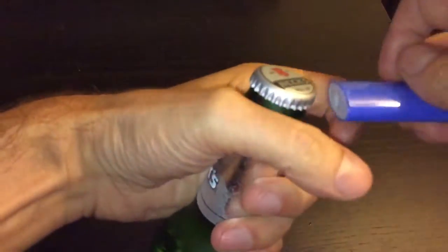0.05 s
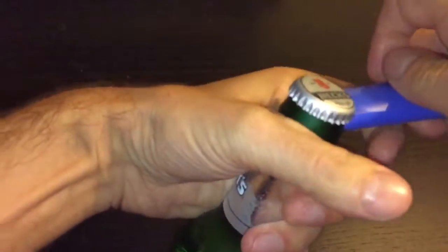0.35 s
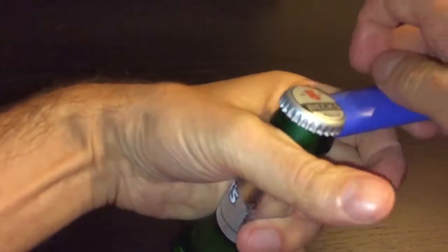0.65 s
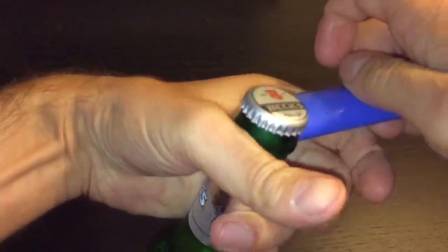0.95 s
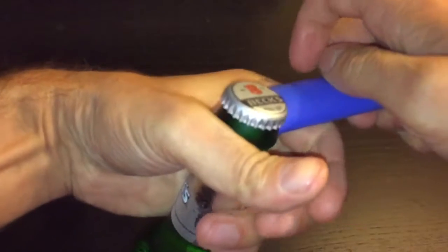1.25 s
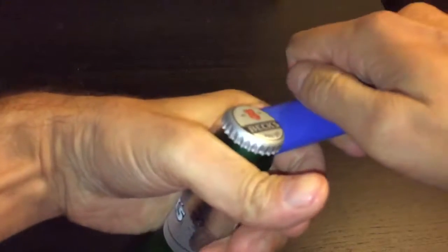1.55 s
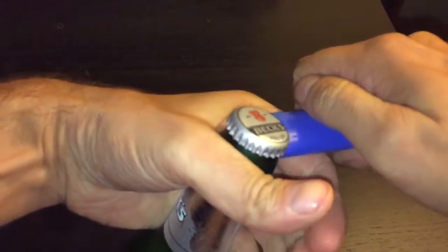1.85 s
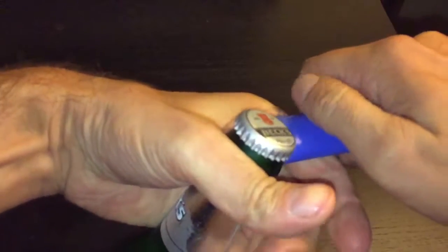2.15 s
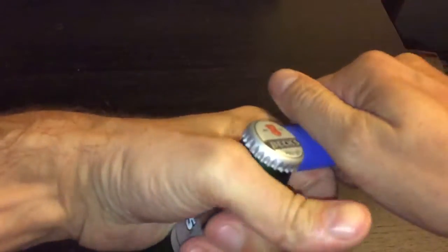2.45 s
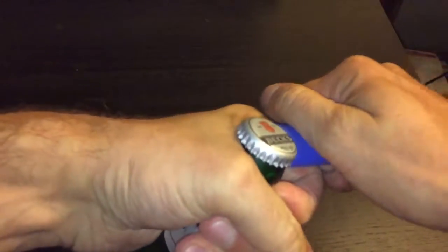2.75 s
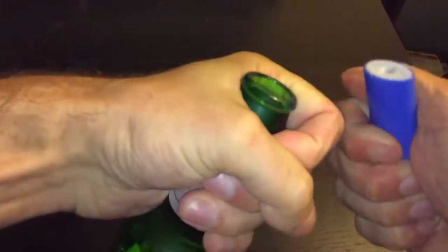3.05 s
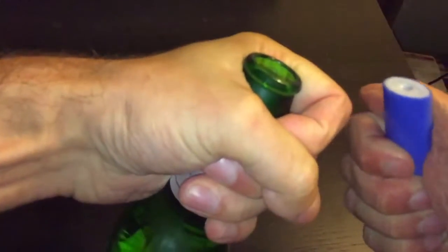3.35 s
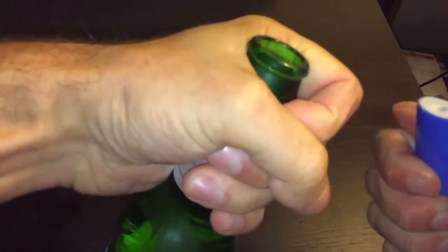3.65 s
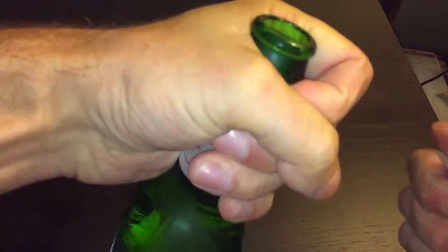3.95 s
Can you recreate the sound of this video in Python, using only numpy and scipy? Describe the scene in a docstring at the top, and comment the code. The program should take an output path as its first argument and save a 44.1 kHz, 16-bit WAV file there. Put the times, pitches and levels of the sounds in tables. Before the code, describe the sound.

A bottle cap is popped off with a lighter, close up in a small room. Plastic ticks and scuffs on the metal cap during the first second, then slips with two snaps near 1.9 and 2.3 seconds. At 2.9 seconds comes a loud, hollow, slightly distorted pop. Faint fizz follows, the cap clatters further off around 3.4 seconds, and the bottle softly bumps the table until about 4 seconds.

```python
"""Opening a bottle with a lighter

In a small room a plastic lighter ticks, scuffs and snaps against the crown cap of a glass bottle.
The seal cracks, and a blast of gas rings the neck with a pop that overloads the microphone.
The cap lands and clatters further off, the bottle bumps the table, and the drink fizzes lightly."""
import sys
import numpy as np
from scipy import signal
from scipy.fft import rfft, irfft
from scipy.io import wavfile
from scipy.ndimage import uniform_filter1d

SR = 44100
rng = np.random.default_rng(int(sys.argv[2]) if len(sys.argv) > 2 else 0)


def store_wav(level_fs):
    """Save 16-bit WAV to argv[1]."""
    pcm = np.round(np.clip(np.atleast_2d(level_fs), -1, 1) * 32767)
    wavfile.write(sys.argv[1], SR, pcm.T.astype(np.int16))


N = 176400
TIME_S = np.arange(N) / SR
EVENT_S = TIME_S[:SR]  # time within one event

# room decay: freq_hz, t60_s
ROOM_DECAY = [(100, 0.16), (300, 0.45), (1000, 0.27), (3000, 0.22), (8000, 0.27), (16000, 0.063)]


def amp(db):
    """Decibels to gain."""
    return 10 ** (np.asarray(db) / 20)


def unit(x):
    """Scale to rms 1."""
    return x / np.sqrt(np.mean(x ** 2) + 1e-20)


def read(points, hz):
    """Interpolate a table over log frequency."""
    freq_hz, value = np.transpose(points)
    return np.interp(np.log(hz + 1), np.log(freq_hz + 1), value)


def add(mix, start_s, sound):
    """Mix a sound in at start_s."""
    part = mix[round(start_s * SR):][:len(sound)]
    part += sound[:len(part)]


def fade(time_s, t60_s):
    """Exponential decay."""
    return np.exp(-np.log(1000) * time_s / t60_s)


def ramp(rise_s):
    """Linear attack, held at 1."""
    return np.minimum(EVENT_S / rise_s, 1)


def colour(x, spectrum, size=4096):
    """Causal unit-energy filter with the given spectral shape."""
    log_gain = np.log(amp(read(spectrum, abs(np.fft.fftfreq(size, 1 / SR)))))
    taps = np.fft.ifft(np.exp(np.conj(signal.hilbert(log_gain)))).real[:size // 2]
    return signal.fftconvolve(x, taps / np.linalg.norm(taps))[:len(x)]


def burst(spectrum, t60_s):
    """Decaying puff of coloured noise."""
    return colour(rng.standard_normal(SR) * fade(EVENT_S, t60_s), spectrum)


def click(spectrum, scatter, t60_s):
    """One sharp contact, then a short noisy scatter."""
    drive = rng.standard_normal(SR) * fade(EVENT_S, t60_s)
    drive *= scatter / np.linalg.norm(drive)
    drive[0] = 1
    return colour(drive, spectrum)


def ring(modes, rise_s=.0008):
    """Decaying sine modes of a resonator."""
    rise = 1 - np.exp(-EVENT_S / rise_s)
    return rise * sum(amp(db) * fade(EVENT_S, t60_s) * np.sin(2 * np.pi * hz * EVENT_S)
                      for hz, db, t60_s in modes)


def struck(modes, vary_db=3.0):
    """Each touch lands on another spot and reweights the weaker modes."""
    return ring([(hz, db + rng.uniform(-1.26, 1) * vary_db * (db < 0), t60_s) for hz, db, t60_s in modes])


def room(x, decay, rise_s=0.0026):
    """Diffuse tail with a decay time per band."""
    hz, time_s, bands = signal.stft(rng.standard_normal(SR), SR, nperseg=256)
    tail = signal.istft(bands * fade(time_s, read(decay, hz)[:, None]), SR, nperseg=256)[1][:SR]
    tail *= 1 - np.exp(-(EVENT_S / rise_s) ** 2)
    return signal.fftconvolve(x, tail / np.linalg.norm(tail))[:N]


def nearby(x, count=12, span_s=.012, echo_gain=.9):
    """Early reflections off nearby surfaces ripple the spectrum."""
    taps = np.zeros(round(span_s * SR))
    taps[rng.integers(count, len(taps), count)] = rng.choice([-1, 1], count) * echo_gain / np.sqrt(count)
    taps[0] = 1
    return signal.fftconvolve(x, taps / np.linalg.norm(taps))[:N]


def air(level_db=-67, split_hz=350, wander_db=-4):
    """Steady room hiss over the wandering rumble of gripping hands."""
    # background spectrum: freq_hz, gain_db
    spectrum = [(15, -36), (25, -7.5), (64, -1), (102, -13.5), (166, -15), (217, -16.5), (503, -32.5),
                (695, -31.5), (2410, -36.5), (3340, -35.5), (5000, -41), (6380, -40), (16000, -48)]
    # grip rumble: time_s, gain_db
    grip = [(0, 1), (.7, -0.5), (1.05, -5), (1.4, 2), (2.2, -3.5), (2.85, 0.5), (3.1, -6), (4.0, -11.5)]
    hz = np.fft.rfftfreq(N, 1 / SR)
    noise_bins = rfft(rng.standard_normal(N)) * amp(read(spectrum, hz))
    lowpass = 1 / (1 + (hz / split_hz) ** 4)
    rates_hz = np.geomspace(.7, 9, 20)
    wander = unit(sum(np.sin(2 * np.pi * (rate * TIME_S + rng.random())) for rate in rates_hz))
    rumble_db = wander_db * wander + np.interp(TIME_S, *np.transpose(grip))
    rumble = irfft(noise_bins * lowpass, N) * amp(rumble_db)
    hiss = irfft(noise_bins * (1 - lowpass), N)
    return amp(level_db) * unit(rumble + hiss)


def bubbles(rate_per_s=1200, spread_db=1):
    """Bursting bubbles as a dense random impulse train."""
    size = amp(spread_db * np.minimum(rng.exponential(1, N), 5))
    return unit(size * rng.choice([-1, 1], N) * (rng.random(N) < rate_per_s / SR))


def fizz():
    """Bubbles burst in the open bottle; hollow resonances swell and fade."""
    # fizz spectrum: freq_hz, gain_db
    spectrum = [(60, -13), (200, 8), (330, 4.5), (550, 0.5), (1000, 0.5), (1550, -6.5), (2100, -2.5),
                (3000, -9), (4300, -15), (6500, -31.5), (7900, -24.5), (9500, -31.5), (13500, -32.5),
                (16000, -38.5)]
    # fizz envelope: time_s, level_db
    envelope = [(2.95, -70.5), (3.17, -66), (3.21, -61), (3.33, -59.5), (3.55, -56.5), (3.75, -59),
                (3.87, -63), (4.0, -64)]
    # hollow resonances: centre_hz
    centres_hz = [935, 890, 930, 1850, 3270, 345, 1272, 2050, 7800, 4300]
    # swell of each resonance: peak_s, sigma_s, width_hz, level_db
    swells = [(3.12, .08, 40, -66), (3.22, .035, 50, -57), (3.39, .11, 50, -55), (3.15, .2, 70, -68),
              (3.28, .15, 130, -68), (3.68, .14, 70, -63), (3.87, .17, 25, -62), (3.8, .2, 200, -67),
              (3.81, .08, 450, -76), (3.98, .12, 700, -75)]
    time_s, level_db = np.transpose(envelope)
    out = amp(np.interp(TIME_S, time_s, level_db)) * colour(bubbles(), spectrum)
    drive = bubbles()
    for hz, (peak_s, sigma_s, width_hz, db) in zip(centres_hz, swells):
        b, a = signal.iirpeak(hz, hz / width_hz, SR)
        hollow = unit(signal.lfilter(b, a, signal.lfilter(b, a, drive)))
        swell = np.exp(-((TIME_S - peak_s) / sigma_s) ** 2 / 2)
        out += amp(db) * swell * hollow
    return out * (TIME_S > time_s[0])


def table_bumps(octave_db=-13.5):
    """The bottle bumps the table top: soft low tones, each with its octave."""
    # bumps: start_s, level_db, pitch_hz, t60_s
    bumps = [(3.425, -35, 191, 0.1), (3.495, -35.5, 185.7, 0.17), (3.838, -38, 163, 0.11),
             (3.887, -44.5, 178, 0.1), (3.927, -46.5, 154, 1)]
    out = np.zeros(N)
    for start_s, db, hz, t60_s in bumps:
        add(out, start_s, ramp(0.015) * ring([(hz, db, t60_s), (2 * hz, db + octave_db, t60_s)]))
    return out


def loose_cap(rattle_wet_db=-4.5, rim_wet_db=-14, tail_t60_s=0.92):
    """The cap bounces some way off: rim pings, rattle and a long rustling tail."""
    # bounces: start_s, rattle_db, rattle_t60_s, ping_db
    landings = [(3.3138, -37.5, 0.029, -36.5), (3.3665, -25.5, 0.029, -29), (3.427, -34.5, 0.16, -28),
                (3.487, -46, 0.025, -44), (3.51, -39, 0.039, -42.5)]
    # rattle spectrum: freq_hz, gain_db
    spectrum = [(60, -4), (180, -2), (400, -5), (650, 3.5), (1000, -10), (1450, -13.5), (2300, 0.5),
                (2750, -2.5), (3400, -19.5), (3900, -13), (4600, -38), (5300, -13), (6400, -42),
                (8500, -34.5), (12500, -39.5), (15300, -30)]
    # cap rim: freq_hz, gain_db, t60_s
    rim_modes = [(5520, 0, .011), (5200, -6, .016), (5750, -8, .01), (8500, -17, .01), (14450, -23, .008),
                 (15350, -23, .008)]
    rattle, rim = np.zeros(N), np.zeros(N)
    for start_s, rattle_db, t60_s, ping_db in landings:
        add(rattle, start_s, amp(rattle_db) * burst(spectrum, t60_s) * ramp(0.0034))
        add(rim, start_s, amp(ping_db) * ring(rim_modes))
    send = amp(rattle_wet_db) * rattle + amp(rim_wet_db) * rim
    return rattle + rim + room(send, [(1000, tail_t60_s)])


def lighter(wet_db=-16):
    """The lighter taps and rubs the cap and slips on its teeth under load; cap and glass ring."""
    # touches: start_s, tick_db, scatter_t60_s, cap_db, teeth_db, glass_db
    taps = [(0.2694, -19.5, 0.032, -32.5, -54, -63), (0.3961, -41.5, 0.032, -48, -80, -75.5),
            (0.5608, -20.5, 0.028, -34, -59, -62), (0.6504, -22.5, 0.018, -43.5, -67, -56)]
    # slips: start_s, snap_db, glass_db
    snaps = [(1.8978, -19, -62), (2.3464, -14, -57.5)]
    # fingers and plastic rubbing: start_s, level_db, t60_s, centre_hz, width_oct
    scuffs = [(0.1, -54.5, 0.15, 1450, 0.88), (0.367, -64, 0.24, 3080, 0.044),
              (.392, -55, 0.045, 1890, 1.03), (0.765, -60, 0.074, 6900, 1.4), (.77, -63.5, .14, 3630, 0.24),
              (0.816, -63, 0.046, 2780, 0.26), (1.146, -68, 0.03, 3260, 0.11), (1.75, -71, 0.094, 2800, 1),
              (2.515, -75, 0.45, 2250, 0.45), (2.581, -55.5, 0.068, 890, 0.87)]
    # contact spectra: freq_hz, gain_db
    tick_spectrum = [(100, -32), (500, -10), (900, -0.5), (1600, 0), (2200, 11), (3200, 6.5), (4400, -7),
                     (7000, -19.5), (16000, -22)]
    snap_spectrum = [(100, -41), (700, -6.5), (950, -14), (1700, -5.5), (2250, 18), (3100, 6), (3700, -2.5),
                     (4800, 0.5), (7500, -9.5), (10000, -6), (16000, -19)]
    # cap, its teeth and the bottle: freq_hz, gain_db, t60_s
    cap_modes = [(3090, 0, .04), (3130, -7, .035), (3070, -27, .4), (1470, -21, .07), (1995, -18, .05),
                 (4495, -35, .12), (6080, -21, .055), (6290, -22, .04)]
    teeth_modes = [(11590, 0, .06), (10770, -17, .15), (8540, -12, .07), (13110, -11, .05),
                   (13670, -16, .12)]
    glass_modes = [(1190, 5, 0.16), (1690, -9, 0.19), (2180, -29, 0.19), (6105, 4.5, 0.04)]
    out, glass = np.zeros(N), ring(glass_modes)
    for start_s, tick_db, t60_s, cap_db, teeth_db, glass_db in taps:
        cap = amp(cap_db) * struck(cap_modes) + amp(teeth_db) * struck(teeth_modes)
        tick = amp(tick_db) * click(tick_spectrum, scatter=1, t60_s=t60_s)
        add(out, start_s, tick + cap + amp(glass_db) * glass)
    for start_s, snap_db, glass_db in snaps:
        snap = amp(snap_db) * click(snap_spectrum, scatter=0.41, t60_s=0.031)
        add(out, start_s, snap + amp(glass_db) * glass)
    hz = np.geomspace(50, 16000, 50)
    for start_s, db, t60_s, centre_hz, width_oct in scuffs:
        band_db = -10 * np.log10(1 + (np.log2(hz / centre_hz) / width_oct) ** 4)
        add(out, start_s, amp(db) * burst(np.c_[hz, band_db], t60_s) * ramp(0.00174))
    return out + amp(wet_db) * room(out, ROOM_DECAY)


def pop():
    """The seal cracks and leaks, a blast of gas rings the air in the neck, hands and bottle recoil."""
    # seal crack, first gas, main blast and recoil spectra: freq_hz, gain_db
    crack_spectrum = [(40, -11), (200, 6), (450, -9), (800, 13), (1200, -4.5), (2000, -20.5), (3500, -22.5),
                      (7000, -40.5), (16000, -31.5)]
    leak_spectrum = [(100, -2.5), (2000, -4), (7500, -24.5), (8700, 2.5), (16000, -4.5)]
    blast_spectrum = [(60, -8), (150, 7), (300, 7), (500, -3), (1000, -3.5), (1600, 4), (2400, 5.5),
                      (4000, 0.5), (5600, -4), (7500, -10), (10000, -11.5), (13000, -5.5), (16000, -13.5)]
    thud_spectrum = [(60, -22), (100, -10), (140, 3), (290, 5), (450, -8), (720, -4), (1200, -12),
                     (2000, -27), (16000, -45)]
    # after-ring of neck and glass: freq_hz, gain_db, t60_s
    overtones = [(936, -37, .22), (1860, -45, .22), (2790, -27, .05), (3280, -57, .25)]
    crack_s, leak_s, push_s, pop_s = 2.8908, 2.9027, 2.905, 2.9122
    crack_db, leak_db, swell_db, pop_db, blast_db, thud_db = -29, -37, -17, 16, 4.5, -13
    neck_hz, neck_t60_s, neck_rise_s = 932, .07, .0016
    push_hz, push_db, push_t60_s = 60, -4, .08
    swell_lead_s, blast_lead_s = .0045, .002
    pop_wet_db, blast_wet_db = -27, -23
    out, blast = np.zeros(N), np.zeros(N)
    add(out, crack_s, amp(crack_db) * burst(crack_spectrum, t60_s=.085))
    leak = rng.standard_normal(SR) * (EVENT_S < pop_s - leak_s)
    add(out, leak_s, amp(leak_db) * colour(leak, leak_spectrum))

    # the neck starts to sound just before the cap lets go
    since_pop_s = np.maximum(EVENT_S - swell_lead_s, 0)
    attack = np.minimum(since_pop_s / neck_rise_s, 1) ** 2
    level = amp(swell_db) * ramp(swell_lead_s) + amp(pop_db) * attack
    neck = level * fade(since_pop_s, neck_t60_s) * np.sin(2 * np.pi * neck_hz * EVENT_S)
    add(out, pop_s - swell_lead_s, neck)
    add(out, pop_s, amp(pop_db) * ring(overtones))
    add(blast, pop_s - blast_lead_s, amp(blast_db) * burst(blast_spectrum, t60_s=.045) * ramp(.003) ** 4)
    tail = amp(pop_wet_db) * room(out, ROOM_DECAY) + amp(blast_wet_db) * room(blast, ROOM_DECAY)
    out += blast + tail

    # recoil thud and low push stay dry
    add(out, pop_s, amp(thud_db) * burst(thud_spectrum, t60_s=.16))
    add(out, push_s, ring([(push_hz, push_db, push_t60_s)]) * ramp(.02))
    return out


def scene():
    """All sources at one microphone."""
    return (lighter() + pop() + nearby(loose_cap()) + table_bumps() + nearby(fizz()) + air())[None]


def record(dry):
    """Gain control ducks on the pop and recovers; the peak soft-clips; the band is limited."""
    threshold_db, duck_share, attack_s, release_db_per_s = -10, .45, .008, 24
    ceiling, knee = .51, 4.0
    low_cut_hz, high_cut_hz = 34, 15950
    power_db = 10 * np.log10(abs(uniform_filter1d(dry[0] ** 2, size=64)) + 1e-12)
    fall_db = TIME_S * release_db_per_s
    held_peak_db = np.maximum.accumulate(power_db + fall_db) - fall_db
    over_db = np.maximum(held_peak_db - threshold_db, 0)
    pole = np.exp(-1 / (attack_s * SR))
    ducked = dry / amp(duck_share * signal.lfilter([1 - pole], [1, -pole], over_db))
    clipped = ducked / (1 + abs(ducked / ceiling) ** knee) ** (1 / knee)
    highpass = signal.butter(3, low_cut_hz, "high", fs=SR, output="sos")
    lowpass = signal.firwin(255, high_cut_hz, window=("kaiser", 9), fs=SR)
    return signal.oaconvolve(signal.sosfilt(highpass, clipped), lowpass[None], "same")


dry = scene()
out = record(dry)
store_wav(out)
```